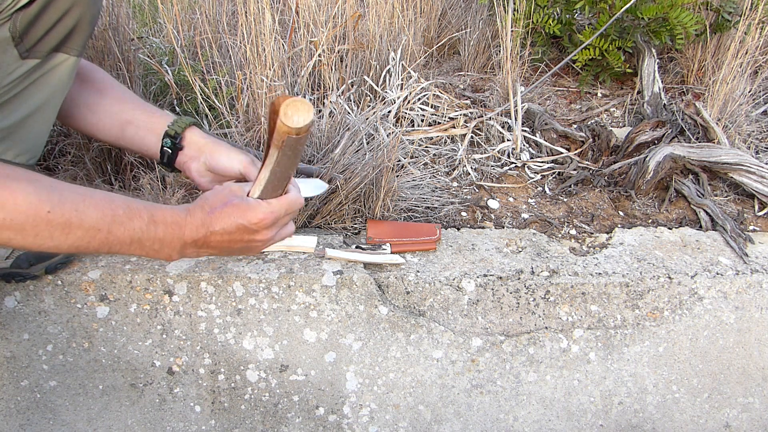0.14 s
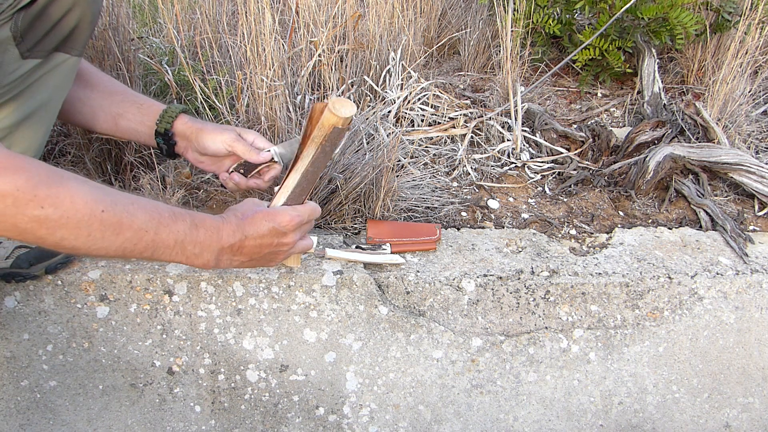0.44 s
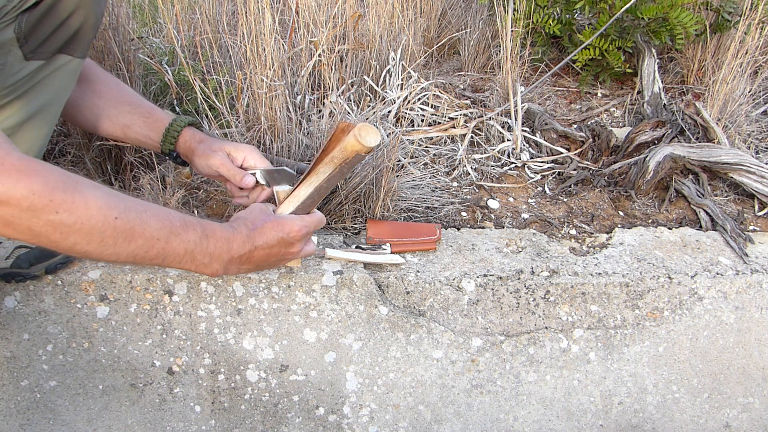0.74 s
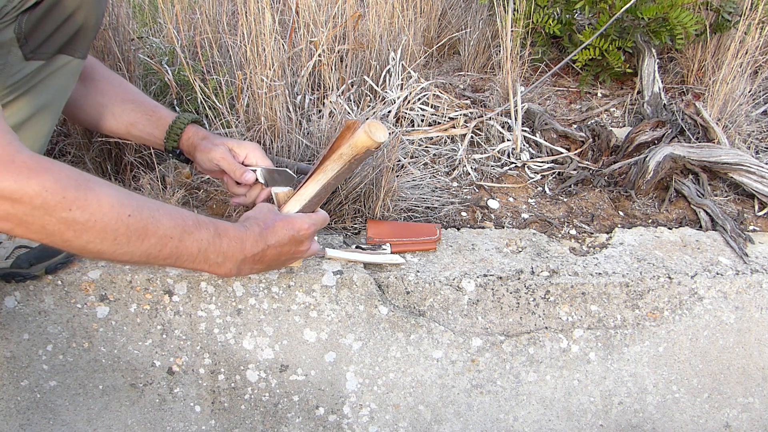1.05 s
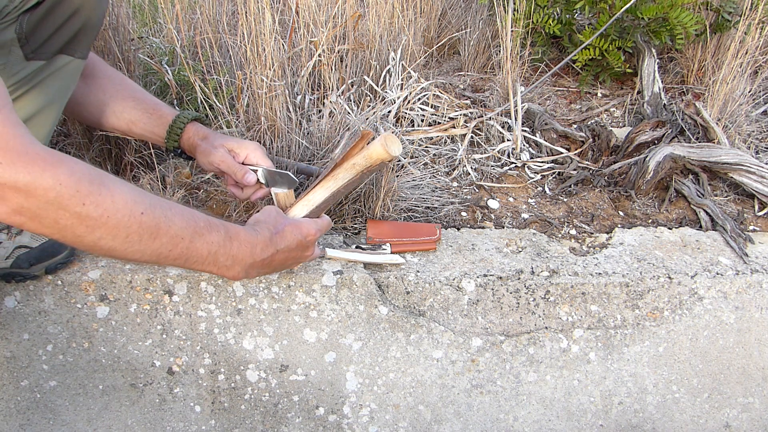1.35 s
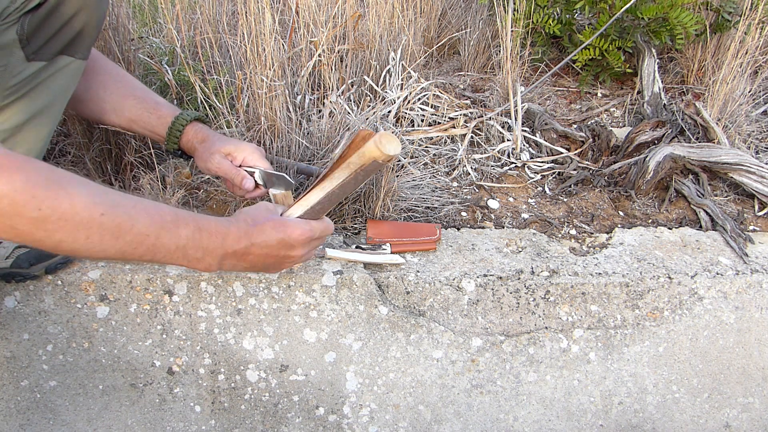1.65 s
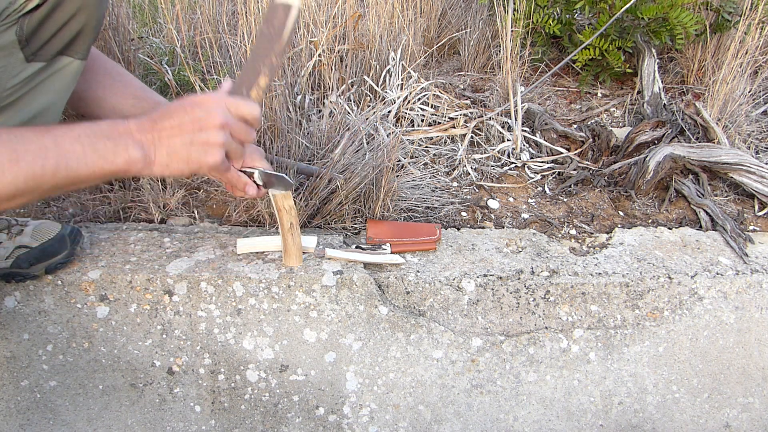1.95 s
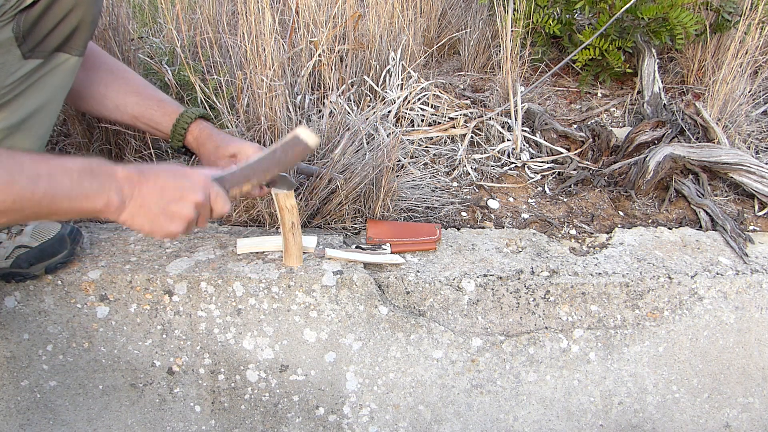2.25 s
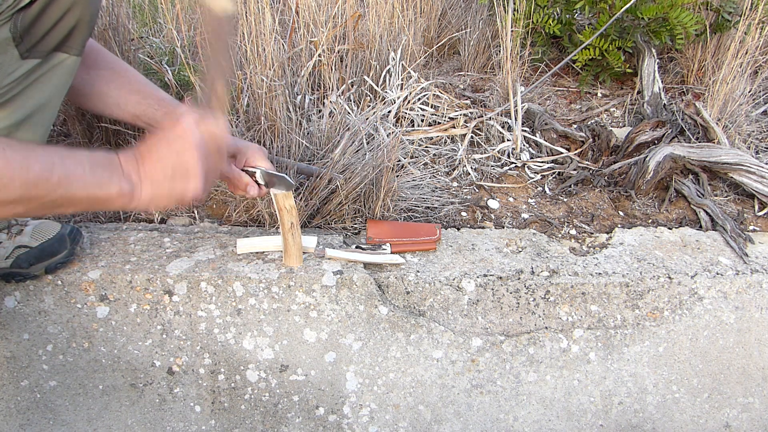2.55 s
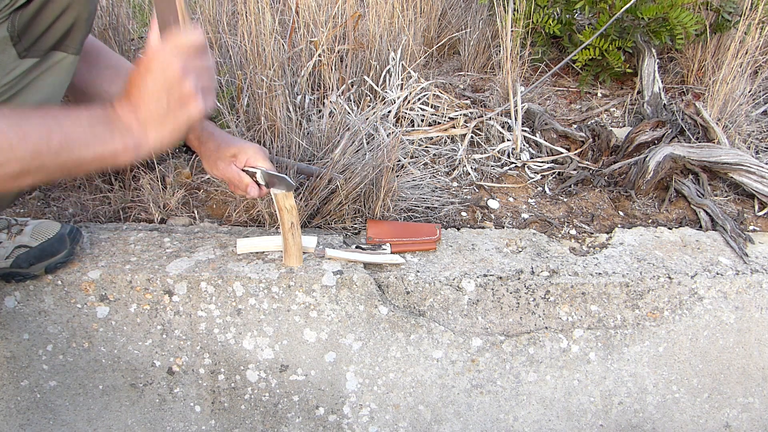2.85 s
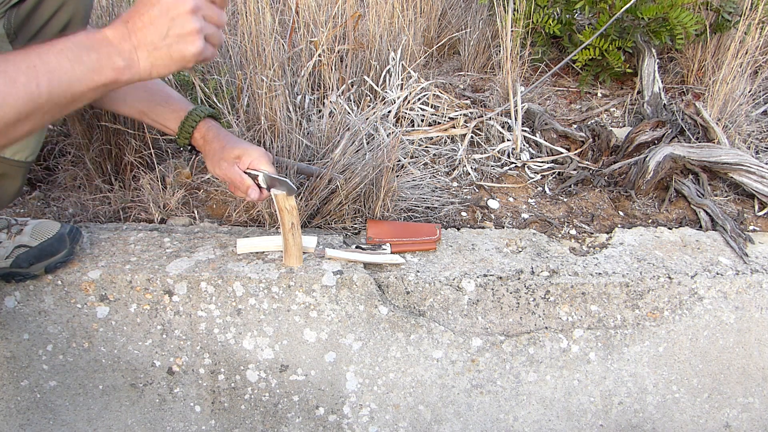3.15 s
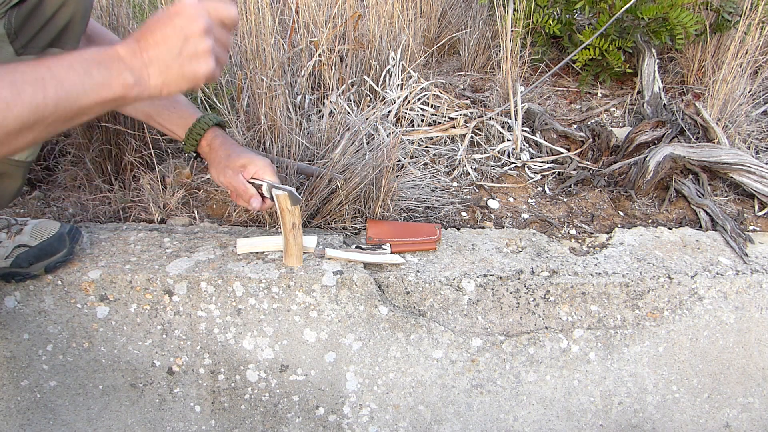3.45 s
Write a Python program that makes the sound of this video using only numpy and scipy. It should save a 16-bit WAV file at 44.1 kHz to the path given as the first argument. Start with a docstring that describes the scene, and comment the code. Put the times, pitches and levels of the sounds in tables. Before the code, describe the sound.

A wooden baton strikes a knife on a stick four times, about a third of a second apart, each a sharp clack with short ring and splintering, after quiet handling scrapes; low distant rumble beneath.

```python
"""A wooden baton knocks four times on the spine of a knife set on a stick, outdoors and close by.
Each blow is a short ragged contact that rings wood and blade, with a knock, a thud and splintering noise.
Hands, wood and dry grass scrape (clumps of tiny grains) and tick (short tones and noise bursts).
A bird chirps once (two gliding harmonics) over distant rumble and hiss (shaped noise) and hum.
The blows overload the input, and a gain control ducks the background after each."""
import sys
import numpy as np
from scipy import signal
from scipy.io import wavfile
from scipy.ndimage import uniform_filter1d

SR = 44100
rng = np.random.default_rng(int(sys.argv[2]) if len(sys.argv) > 2 else 0)


def log_audio(samples):
    """Write samples as a 16-bit WAV file to the path given in sys.argv[1]."""
    # one column per channel
    frames = np.atleast_2d(samples).T
    # limit to full scale, then quantise
    limited = np.clip(frames, -1, 1)
    pcm = np.round(limited * 32767).astype(np.int16)
    wavfile.write(sys.argv[1], SR, pcm)


N = 158760  # samples, 3.6 s

# Distant rumble and hiss, relative spectrum: f/Hz, level/dB per Hz
AIR_SPECTRUM = [(15, -54), (25, -48.5), (96, 3), (175, -9.5), (297, -8), (348, -16), (418, -11), (589, -21),
                (971, -23.5), (1920, -39.5), (3090, -40), (3820, -36.5), (4350, -44.5), (12500, -45),
                (13500, -54)]
AIR_DB = -35
# Wavering hum lines: f/Hz, level/dB, width/Hz
HUM_LINES = [(296.5, -44, 3.8), (215.5, -45, 12), (112.75, -39, 23)]
# Noise that differs between left and right, relative spectrum: f/Hz, level/dB per Hz
SIDE_SPECTRUM = [(59, -27.5), (100, -4.5), (309, -14.5), (364, -2.5), (661, -0.5), (12400, -4.5),
                 (13500, -22)]
# Microphone response to close sounds: f/Hz, level/dB
MIC_RESPONSE = [(100, -2.5), (1000, -8), (2500, 2), (3200, 8.5), (3800, 15), (4500, 0.5), (7000, -7),
                (11000, -8.5), (13500, -25)]
# Ticks: t/s, knock level/dB, knock f/Hz, snap level/dB
TICK_EVENTS = [(0.3013, -35, 1320, -43.5), (0.4503, -23.5, 654, -42), (.638, -47, 1490, -48),
               (.7926, -41, 9000, -40.5), (0.8, -40, 5300, -42), (0.8578, -36, 1410, -44),
               (1.011, -42, 3400, -46.5), (1.148, -39.5, 2500, -56), (1.157, -40, 2570, -46),
               (1.5247, -35, 1140, -51), (1.7263, -35, 1750, -43), (1.737, -40, 7900, -32.5),
               (1.784, -55, 9900, -37.5), (2.0073, -39, 4160, -32.5), (2.1925, -24, 834, -41),
               (2.203, -15.5, 450, -40), (2.2757, -2, 3780, -14), (2.4324, -34, 3500, -29.5),
               (2.461, -40, 3460, -34), (2.47, -39, 3530, -39), (2.4843, -30.5, 1300, -35),
               (2.5614, -24, 4010, -26.5), (2.5868, -30, 3720, -34), (2.7229, -40, 3460, -26.5),
               (3.097, -27, 3400, -53), (3.155, -39.5, 10900, -43), (3.4313, -31, 7460, -26),
               (3.449, -28.5, 11150, -27), (3.578, -39.5, 7260, -45.5)]
# Bird's gliding base pitch, heard only through its harmonics: t/s, f/Hz, level/dB
CHIRP_GLIDE = [(1.288, 1050, -62), (1.3, 1266, -46), (1.318, 1500, -53), (1.333, 2000, -45.5),
               (1.348, 1880, -60)]
# Scrapes: t/s, swell length/s (the sound stops by 0.093 s), level/dB, wooden body level/dB over that
SCRAPE_EVENTS = [(1.502, 0.29, -50.5, 6), (1.707, 0.075, -43.5, 2.5), (1.775, 0.11, -41.5, -2),
                 (1.81, 0.071, -27, -7.5), (1.903, 0.057, -30, -28), (2.166, 0.067, -34, -12),
                 (2.186, 0.036, -13.5, -10.5), (2.215, .035, -45.5, -8.5), (2.432, 0.047, -53, -21),
                 (2.537, 0.054, -38, -14), (2.591, 0.067, -30.5, -12.5), (2.6127, 0.0085, -6.5, -11.5),
                 (2.897, 0.028, -31.5, -11), (2.997, 0.037, -34.5, -21), (3.203, 0.1, -41, 2.5),
                 (3.255, 0.069, -35, 1), (3.311, 0.03, -24.5, -42), (3.328, 0.079, -24, -13.5),
                 (3.55, 0.07, -44, -26.5)]
# Dull wooden body rung by scrapes: f/Hz, level/dB, time to fall 60 dB/s
SCRAPE_MODES = [(486, -1, 0.0067), (860, 3.5, 0.0053), (1650, -8, 0.018), (2220, 0.5, 0.0031)]
# Blows: t/s, force level/dB, ring f/Hz, knock f/Hz, then levels/dB relative to the force for
# knock, thud and splinters; last the rebound's share of the first contact (minus is against the ring)
BLOW_EVENTS = [(2.249, 16.5, 3834, 559.4, -6.5, -19.5, -38.5, -0.7),
               (2.6161, 14, 3794, 895, -6.5, -15, -24.5, 0.37),
               (2.9657, 15.5, 3218, 875, -7.5, -32, -43.5, 0.78),
               (3.3252, 14.5, 3502, 1630, -6, -28, -33.5, -0.99)]
# Wood and blade rung by blows: f/Hz, level/dB relative to the main ring, time to fall 60 dB/s
BLOW_MODES = [(1350, -12, 0.0041), (2190, -4.5, 0.01), (3750, -2.5, 0.0034), (4730, -28.5, 0.011),
              (7575, -25.5, .008), (11100, -24, 0.0091)]

# Names ending in T60 are the seconds taken to fall 60 dB
TICK_T60, TICK_AIR_DB = 0.013, -1.5
SMALL_TICKS_PER_S, SMALL_TICK_DB = 13, -58
CHIRP_LOW_DB, CHIRP_LOW_FROM_S = 9.5, 1.322
GRAINS_PER_S, GRAIN_SPREAD_DB, CLUMP_DB = 4000, 4, 3.5
CONTACT_S, RAGGED, REBOUND_S = 0.0012, 0.5, 0.0016
RING_T60, KNOCK_T60 = 0.012, 0.0081
THUD_HZ, THUD_T60 = 302, 0.018
CRACK_DB, CRACK_T60 = -14, 0.03
SPLINTER_S, SPLINTER_FLICKER_DB = 0.048, 3
ECHO_DB, ECHO_T60, ECHO_RING_DB = -51.5, 0.76, -18.5
SIDE_DB, SIDE_CLOSE_DB, SIDE_CORNER_HZ = -60.5, -18.5, 9000
THRESHOLD_DB, MAX_DUCK_DB, RECOVER_DB_PER_S = -9, 23, 91
ATTACK_S, RATIO = 0.0019, 1.635  # RATIO: dB ducked per dB over the threshold
OFFSET, OFFSET_LAG_S, COUPLING_S = 0.06, 0.04, 0.06
OVERLOAD_LEVEL = 0.86
LOW_CUT_HZ, TOP_HZ, EDGE_HZ = 81, 11000, 13300


def amp(db):
    """Turn decibels into an amplitude factor."""
    return 10 ** (np.asarray(db) / 20)


def evened(x):
    """Scale to an RMS (average strength) of 1."""
    return x / np.sqrt(np.mean(x ** 2) + 1e-20)


def read(points, hz):
    """Read a curve at hz, with straight lines between points on a log frequency scale."""
    f, value = np.transpose(points)
    return np.interp(np.log(hz + 1), np.log(f + 1), value)


def add(mix, s, sound):
    """Mix a sound in at s seconds, cutting what runs past the end."""
    part = mix[round(s * SR):][:len(sound)]
    part += sound[:len(part)]


def lag(x, s):
    """One-pole smoothing with time constant s."""
    r = np.exp(-1 / (s * SR))
    return signal.lfilter([1 - r], [1, -r], x)


def mode(hz, db, t60):
    """One way an object rings: a sine that dies away, 60 dB in t60 seconds."""
    t = np.arange(2048) / SR
    return amp(db - 60 * t / t60) * np.sin(2 * np.pi * hz * t)


def colour(points):
    """Causal filter taps with the given dB shape, acting as early as possible (minimum phase)."""
    hz = abs(np.fft.fftfreq(2048, 1 / SR))
    log_gain = np.log(amp(read(points, hz)))
    response = np.exp(np.conj(signal.hilbert(log_gain)))
    return np.fft.ifft(response).real[:1024]


def noise(points, patchy_db):
    """Shaped noise whose level drifts in patches over time and pitch."""
    hz = np.fft.rfftfreq(1024, 1 / SR)
    a, b, patches = rng.standard_normal((N // 256 + 5, 513, 3)).T
    patches = uniform_filter1d(patches, size=10, axis=0)  # across pitch
    patches = evened(uniform_filter1d(patches, size=8, axis=1))  # across time
    spectrum = (a + 1j * b) * amp(read(points, hz)[:, None] + patchy_db * patches)
    sound = signal.istft(spectrum, nperseg=1024, noverlap=768)[1]
    return evened(sound[:N])


def background():
    """Distant rumble and hiss as shaped noise, plus hum tones whose strength and phase wander."""
    t = np.arange(N) / SR
    out = amp(AIR_DB) * noise(AIR_SPECTRUM, 1.5)
    for hz, db, width_hz in HUM_LINES:
        wander = rng.standard_normal(N) + 1j * rng.standard_normal(N)
        waver = lag(wander, 1 / (np.pi * width_hz))  # faster wander makes a wider line
        hum = (waver * np.exp(2j * np.pi * hz * t)).real
        out += amp(db) * evened(hum)
    return out


def ticks():
    """Wood, grit and dry grass: brief ringing knocks, noise snaps and scattered tiny ticks."""
    out, mic = np.zeros(N), colour(MIC_RESPONSE)
    fade = np.exp(-np.arange(150) / 51.0)
    for s, db, hz, snap_db in TICK_EVENTS:
        snap, airy_snap = rng.standard_normal((2, len(fade))) * fade
        add(out, s, mode(hz, db, TICK_T60))
        add(out, s, amp(snap_db) * np.convolve(snap, mic))
        add(out, s, amp(snap_db + TICK_AIR_DB) * airy_snap)
    chosen = rng.random(N) < SMALL_TICKS_PER_S / SR
    strength = amp(SMALL_TICK_DB + 3 * rng.exponential(1, N))  # a few are much louder
    small = chosen * strength * rng.standard_normal(N)
    bright_tick = np.convolve(fade, np.diff(mic))  # diff favours the treble
    return out + signal.oaconvolve(small, bright_tick)[:N]


def bird():
    """One chirp, rising then dipping: third harmonic throughout, second joining near the top."""
    s, hz, db = np.transpose(CHIRP_GLIDE)
    t = np.arange(s[0], s[-1], 1 / SR)
    pitch = uniform_filter1d(np.interp(t, s, hz), size=300)
    turn = 2 * np.pi * np.cumsum(pitch) / SR
    joined = 1 / (1 + np.exp((CHIRP_LOW_FROM_S - t) / 0.0017))  # 0 to 1
    third = (1 - 0.6 * joined) * np.sin(3 * turn)
    second = amp(CHIRP_LOW_DB) * joined * np.sin(2 * turn)
    out = np.zeros(N)
    add(out, s[0], amp(np.interp(t, s, db)) * (third + second))
    return out


def scrapes():
    """Rubbing as clumps of grains under a swell, heard through the mic's peak and a duller wooden body."""
    out, mic = np.zeros(N), colour(MIC_RESPONSE)
    body = sum(mode(*row) for row in SCRAPE_MODES)
    body = body / np.linalg.norm(body)
    t = np.arange(4096) / SR
    for s, length, db, body_db in SCRAPE_EVENTS:
        chance, size, sign, clump = rng.random((4, len(t)))
        strength = amp(-GRAIN_SPREAD_DB * np.log(size + 0.0045))  # rare grains are loud
        grains = (chance < GRAINS_PER_S / SR) * np.sign(sign - 0.5) * strength
        clumps = evened(lag(lag(clump - 0.5, 0.003), 0.003))
        grains = evened(grains * amp(CLUMP_DB * clumps))
        swell = np.sin(np.pi * np.clip(t / length, 0, 1) ** 0.7) ** 2  # peaks before halfway
        grains = grains * swell
        add(out, s, amp(db) * np.convolve(grains, mic))
        add(out, s, amp(db + body_db) * np.convolve(grains, body))
    return out


def blows():
    """Contact and rebound ring wood and blade; fibres crack and splinter; the surroundings answer faintly."""
    out, mic = np.zeros(N), colour(MIC_RESPONSE)
    body = sum(mode(*row) for row in BLOW_MODES)
    t = np.arange(SR // 2) / SR
    for s, db, ring_hz, knock_hz, knock_db, thud_db, splinter_db, rebound in BLOW_EVENTS:
        rough, crackle, hiss, flicker = rng.standard_normal((4, len(t)))

        # Sparse roughness around two main pushes
        contact = RAGGED * rough[:300] * np.exp(-t[:300] / CONTACT_S) * (rng.random(300) < 0.1)
        rebound_s = round(REBOUND_S * ring_hz) / ring_hz  # whole cycles of the ring later
        contact[0] = 2
        contact[round(rebound_s * SR)] = 2 * rebound
        contact = contact / np.linalg.norm(contact)
        add(out, s, amp(db) * np.convolve(contact, body + mode(ring_hz, 0, RING_T60)))
        add(out, s, mode(knock_hz, db + knock_db, KNOCK_T60))
        add(out, s, mode(THUD_HZ, db + thud_db, THUD_T60))

        # Loudness curve of the fibres: flickering splinters plus a smooth crack
        flicker_db = SPLINTER_FLICKER_DB * evened(lag(flicker, 0.0016))
        splinters = amp(splinter_db + flicker_db) * np.clip(1 - t / SPLINTER_S, 0, 1) ** 2
        fibres = splinters + amp(CRACK_DB - 60 * t / CRACK_T60)
        echo = amp(ECHO_DB - 60 * t / ECHO_T60) * hiss
        tail = 0.1 * fibres * crackle
        tail += signal.oaconvolve(fibres * rough + echo, mic)[:len(t)]
        tail += signal.oaconvolve(echo, mode(ring_hz, ECHO_RING_DB, RING_T60))[:len(t)]
        add(out, s, amp(db) * tail)
    return out


def scene():
    """Mix all sounds in the middle, with faint noise and scattered treble making left and right differ."""
    far = background()
    close = ticks() + scrapes() + blows()
    mid = far + close + bird()
    bright = close - lag(close, 1 / (2 * np.pi * SIDE_CORNER_HZ))
    scatter = evened(rng.standard_normal(40)) / np.sqrt(40)
    side = amp(SIDE_DB) * noise(SIDE_SPECTRUM, 1.5)
    side += amp(SIDE_CLOSE_DB) * signal.oaconvolve(bright, scatter)[:N]
    return np.array([mid + side, mid - side])


def record(dry):
    """Gain control ducks after loud sounds, shifting a small input offset; then overload and band limit."""
    level_db = 10 * np.log10(lag((dry ** 2).mean(0), 0.00072) + 1e-12)
    # Hold the highest excess so far, letting it sink at the recovery rate
    fall = np.arange(N) * RECOVER_DB_PER_S / SR
    over_db = np.maximum.accumulate(RATIO * (level_db - THRESHOLD_DB) + fall) - fall
    duck_db = np.clip(over_db, 0, MAX_DUCK_DB)
    for _ in range(3):
        duck_db = lag(duck_db, ATTACK_S)
    gain = amp(-duck_db)
    drift = lag(OFFSET * (gain - 1), OFFSET_LAG_S)

    # Overload: quiet parts pass unchanged, peaks flatten
    squashed = np.tanh((abs(dry * gain) / OVERLOAD_LEVEL) ** 2) ** 0.5
    loud = OVERLOAD_LEVEL * squashed * np.sign(dry)
    loud = signal.lfilter(*signal.butter(1, TOP_HZ, fs=SR), loud)
    loud = signal.lfilter(*signal.butter(2, LOW_CUT_HZ, "high", fs=SR), loud)
    loud = loud + drift - lag(drift, COUPLING_S)  # the slow part of the drift is blocked
    edge = signal.firwin(511, EDGE_HZ, window=("kaiser", 8), fs=SR)  # steep treble limit
    return signal.oaconvolve(loud, edge[None], "same")


dry = scene()
out = record(dry)
log_audio(out)
```